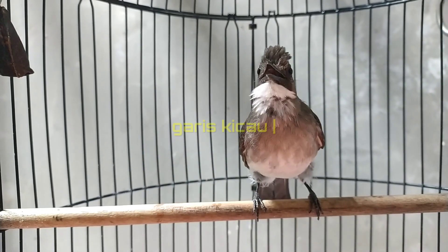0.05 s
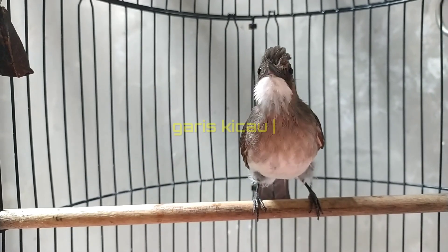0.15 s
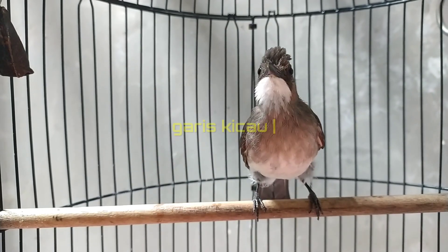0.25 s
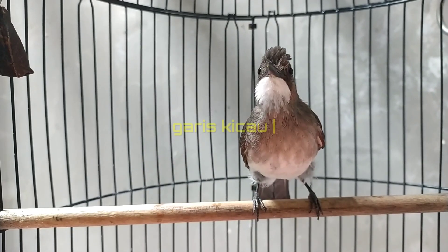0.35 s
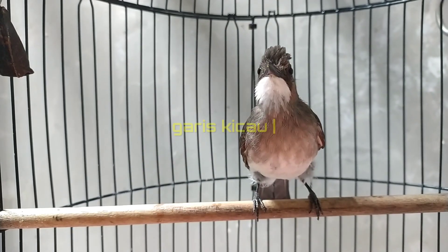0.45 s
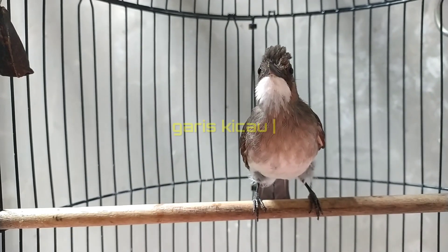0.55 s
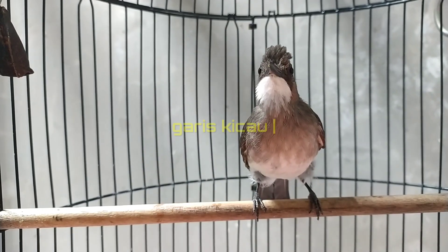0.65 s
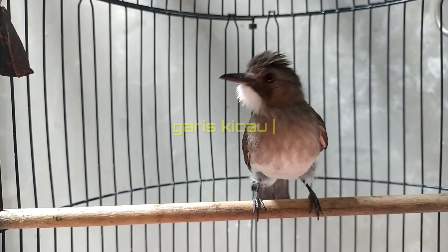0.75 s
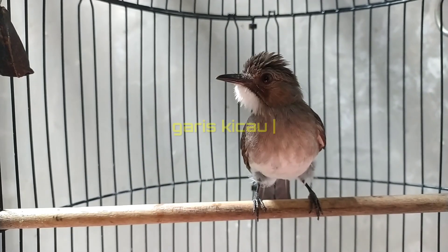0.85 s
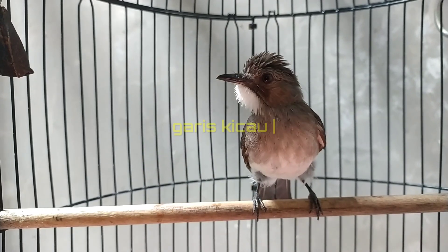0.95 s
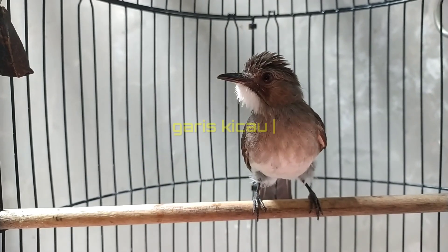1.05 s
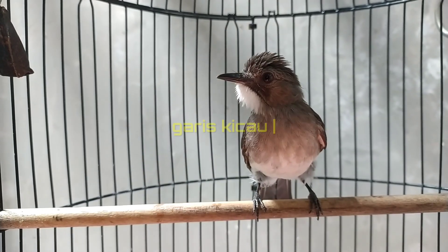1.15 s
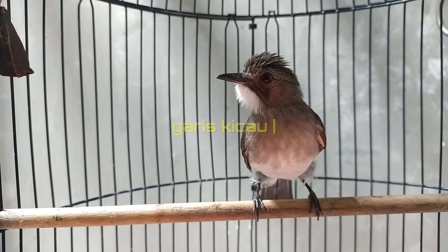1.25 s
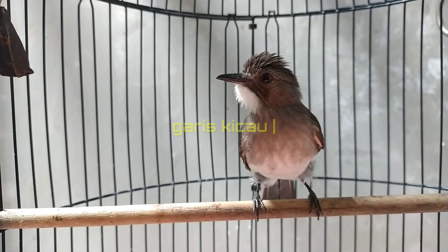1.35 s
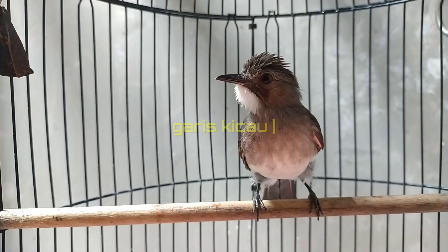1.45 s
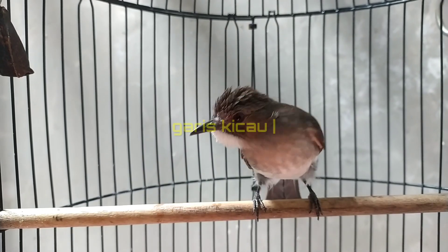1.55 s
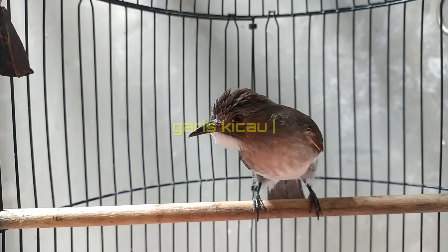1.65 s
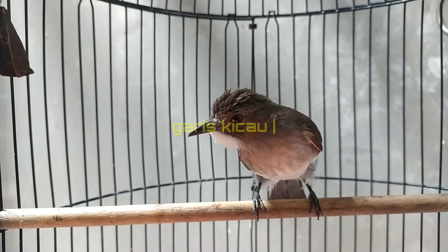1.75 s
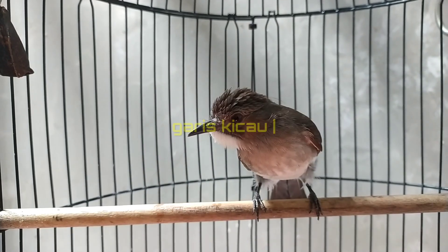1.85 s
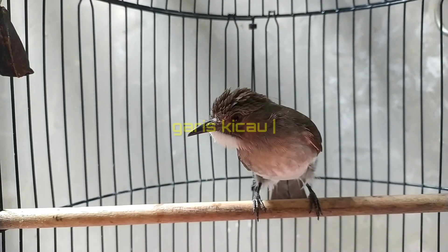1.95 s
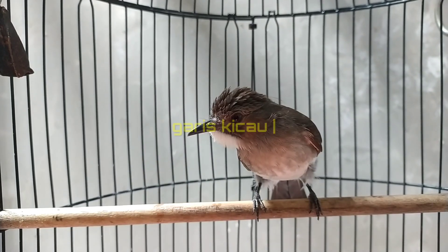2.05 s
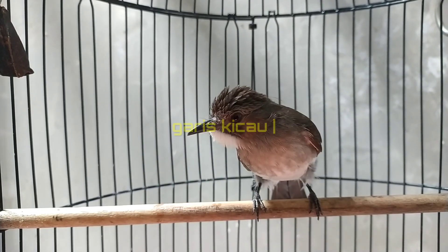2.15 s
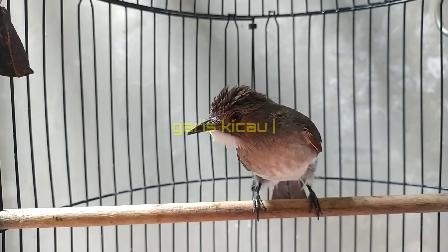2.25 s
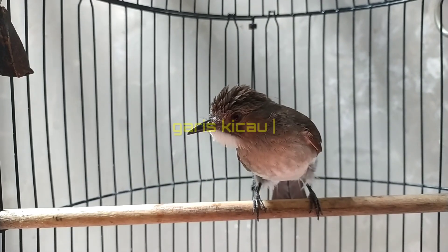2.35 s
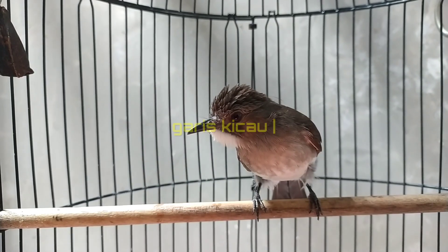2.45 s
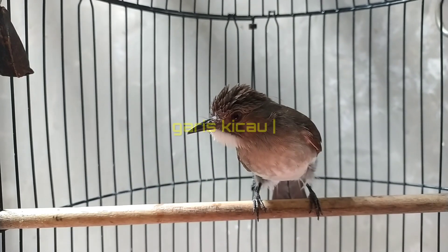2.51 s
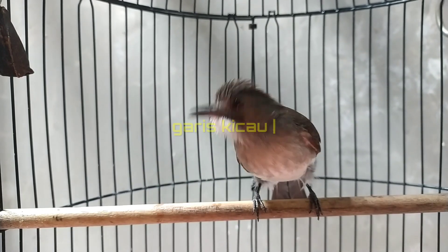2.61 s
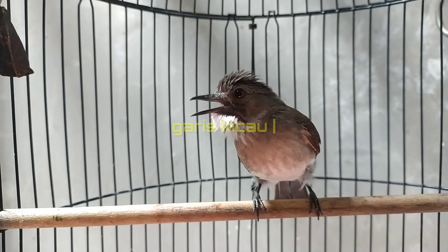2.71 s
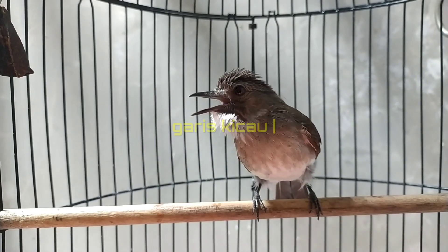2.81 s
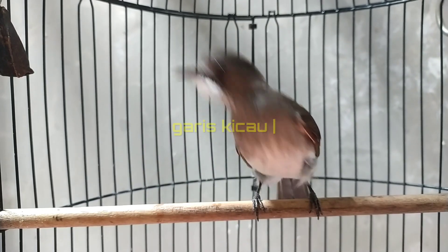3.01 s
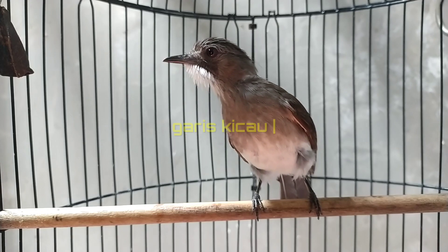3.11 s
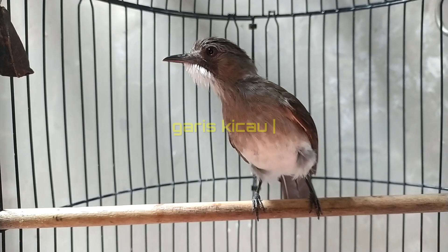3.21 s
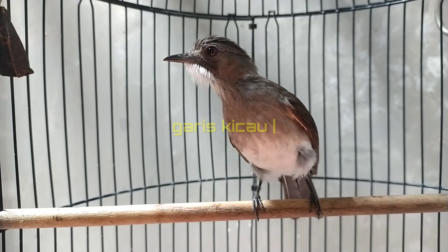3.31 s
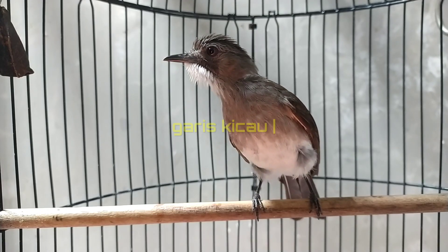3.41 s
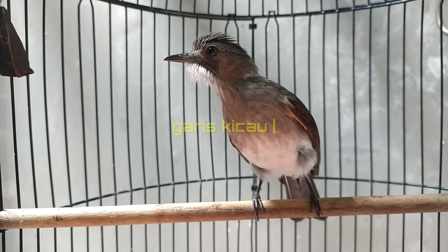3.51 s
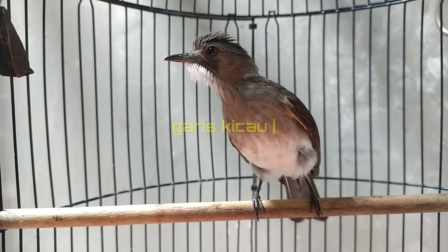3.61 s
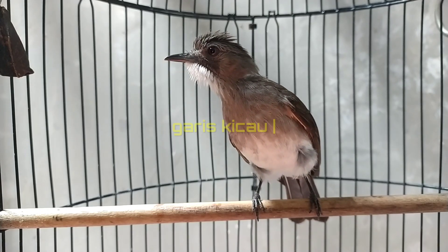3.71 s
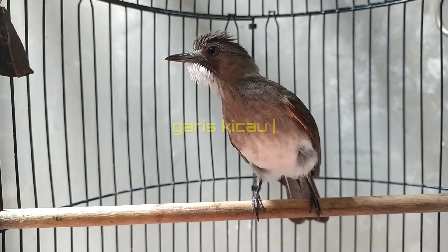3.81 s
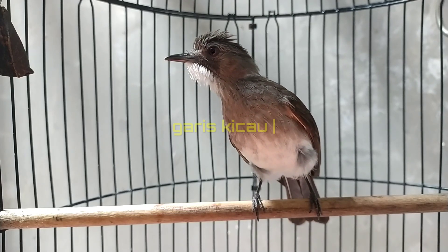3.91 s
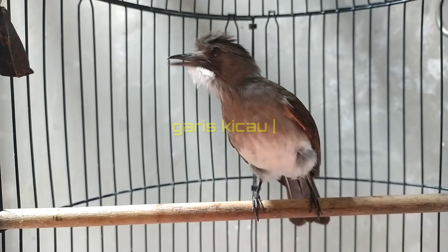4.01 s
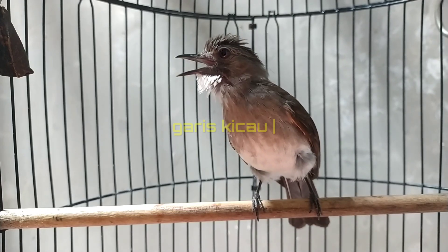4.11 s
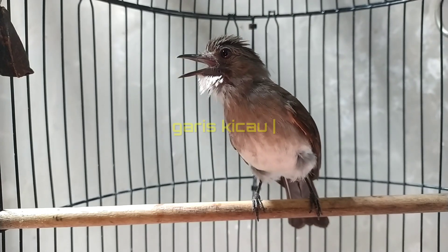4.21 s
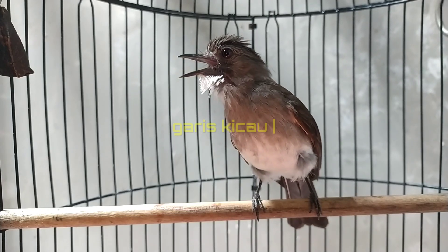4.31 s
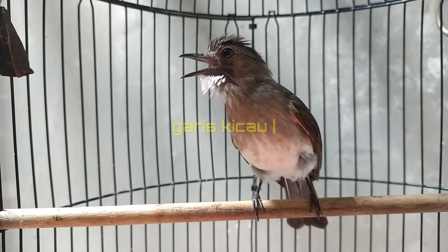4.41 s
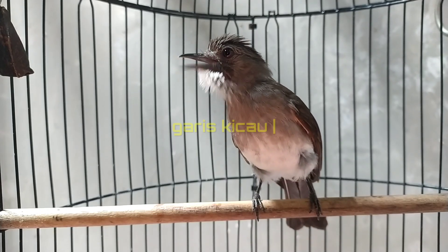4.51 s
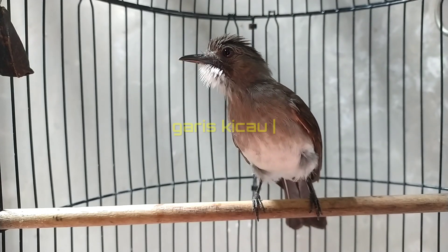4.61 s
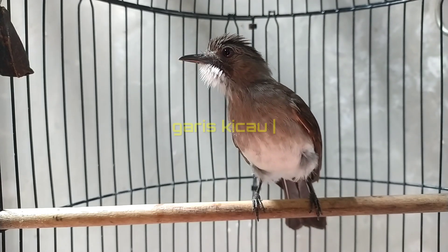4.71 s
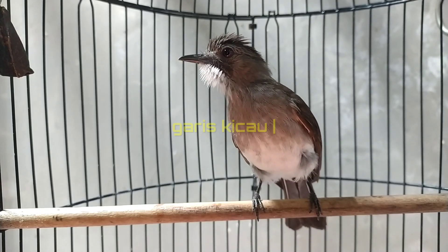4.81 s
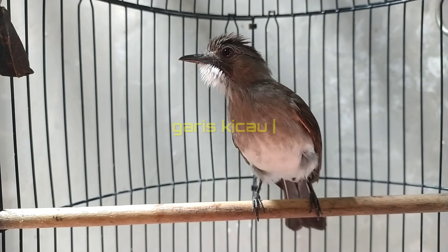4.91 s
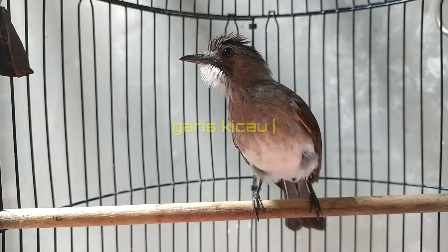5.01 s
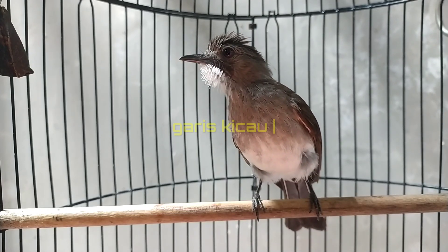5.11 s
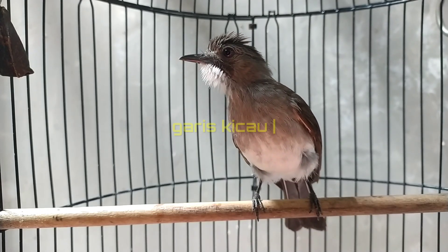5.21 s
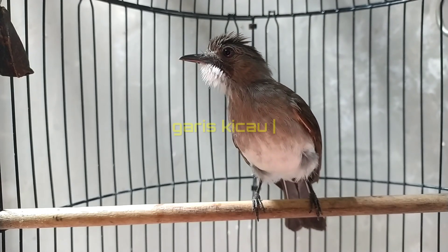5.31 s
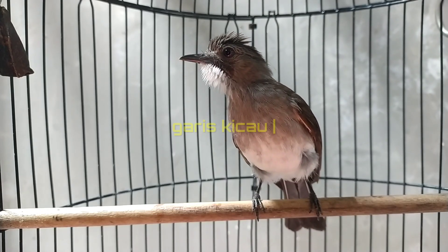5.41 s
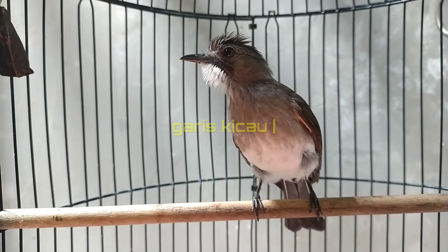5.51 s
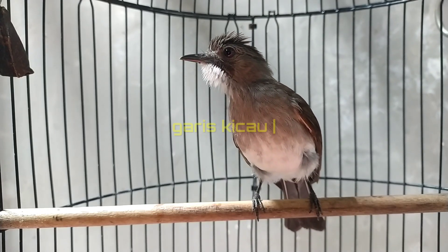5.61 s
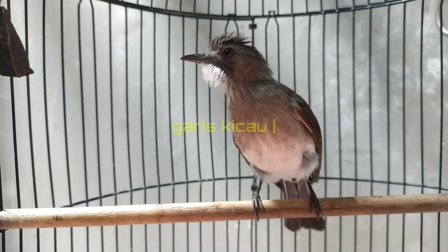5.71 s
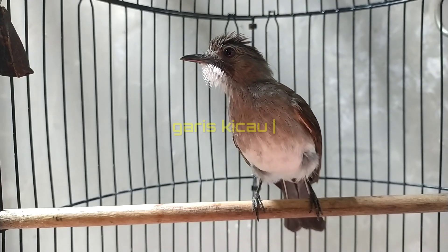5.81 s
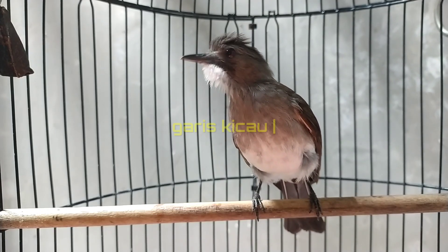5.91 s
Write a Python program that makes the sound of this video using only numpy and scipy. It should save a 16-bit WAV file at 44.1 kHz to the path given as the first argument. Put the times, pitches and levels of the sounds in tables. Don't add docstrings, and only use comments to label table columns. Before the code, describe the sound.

A quiet hard-walled room with soft airy hiss and a very faint low hum. Immediately, from 0 to 0.2 s, a close caged bird gives a clear, nasal, ringing cry that swells fast, rises slightly and drops off. From 0.5 to 1.7 s a smaller bird farther away whistles quick, thin, near-pure notes around 4 to 6 kHz, alternating upward sweeps and brighter hooked notes, blurred by echo. Faint distant harsh scolds overlap at 0.9, 1.4 and 1.6 s, another at 2.1. A tiny feather rustle comes at 2.5. At 2.75 to 3.05 s the close bird bursts into a loud, rough, buzzing scold, falling at the end; a distant answer follows at 3.4 as the hum swells slightly. A longer, somewhat smoother scold runs 4.15 to 4.65. Faint far calls come at 5.1 and 5.5, with a soft rustle at 5.6. Hiss dulls during loud calls.

```python
import sys
import numpy as np
from scipy import signal
from scipy.fft import rfft, irfft
from scipy.io import wavfile
from scipy.ndimage import uniform_filter1d

SR = 44100
rng = np.random.default_rng(int(sys.argv[2]) if len(sys.argv) > 2 else 0)


def unload_wav(signal):
    wavfile.write(
        sys.argv[1],
        SR,
        np.round(np.clip(np.atleast_2d(signal).T, -1, 1) * 32767).astype(np.int16),
    )


def amplitude_ratio(level_db):
    exponent = np.asarray(level_db, float) / 20
    return 10 ** exponent


N = 262395
T = np.arange(N) / SR
BIN_HZ = np.maximum(np.arange(N // 2 + 1) * SR / N, 1)

# f/Hz, level/dB per Hz
HISS_SPECTRUM = [(20, -3.5), (50, -11.5), (100, -15), (300, -16), (600, -19), (1300, -19), (2300, -22.5),
                 (3400, -27), (4600, -30.5), (6500, -35), (9000, -26), (10800, -35), (13000, -42.5),
                 (15500, -53)]
# f/Hz, likeness 0-1
PORT_LIKENESS = [(60, 0.57), (130, 0.61), (290, 0.54), (640, 0.34), (1410, 0.07), (3100, -0.0), (6820, 0.0),
                 (15000, -0.0)]
# t/s, spread/s, level/dB
FEATHER_RUSTLES = [
    (2.47, 0.05, -55.5),
    (5.63, 0.037, -53),
]

# t/s, f/Hz, level/dB
CRY_EFFORT = [
    (0.019, 810, -47.5),
    (.03, 901, -28.5),
    (0.051, 1004, -24.5),
    (0.071, 1036, -24.5),
    (.125, 1038, -26.5),
    (0.167, 1018, -22),
    (0.193, 991, -27.5),
    (.201, 963, -25),
    (.209, 811, -30),
]
CRY_PARTIALS = [-27, -14, -7, -17, -23.5, -33, -29.5, -21, -27, -27.5, -38.5, -32, -33, -42]
# t/s, spread/s, level/dB
BREATH_PUFFS = [
    (0.034, 0.017, -42.5),
    (2.753, 0.011, -42.5),
    (4.154, 0.0071, -53),
]

# t/s, length/s, low f/Hz, top f/Hz, level/dB
SONG_RISES = [
    (.499, 0.042, 4304, 4845, -42),
    (.686, 0.087, 4347, 5475, -35.5),
    (.907, 0.079, 4325, 5575, -34.5),
    (1.135, 0.085, 4330, 5787, -33),
    (1.375, .095, 4327, 5797, -33),
    (1.615, 0.096, 4190, 5783, -33.5),
    (.597, 0.065, 3840, 4555, -49.5),
]
# t/s, length/s, top f/Hz, level/dB
SONG_HOOKS = [
    (0.812, 0.052, 4980, -24.5),
    (1.057, 0.035, 5110, -21.5),
    (1.296, 0.033, 5100, -22),
    (1.54, 0.027, 5076, -21),
]
# t/s, level/dB
SONG_GRACES = [
    (1.041, -43.5),
    (1.281, -44),
    (1.52, -43),
]
# share of length [0-1], share of pitch rise [0-1], level/dB
RISE_OUTLINE = [(0, 0, -8), (.1, 0.45, 7.5), (.4, 0.72, -1), (0.75, 0.86, 4), (0.929, 1, -7),
                (1, 0.76, -89)]
HOOK_OUTLINE = [(0, 0.19, -46), (.08, .2, -12), (0.252, 0.8, -13), (.4, 0.92, -16.5), (0.651, 0.91, -2),
                (0.922, 0.61, -21), (1, 0.81, -38)]
# multiple of pitch, level/dB
WHISTLE_HARMONICS = [(1, -4), (2, -11.5), (3, -27)]

# t/s, length/s, top f/Hz, level/dB, warble depth [0-.4]
NEIGHBOUR_SCOLDS = [
    (0.941, .36, 903.5, -61, 0.32),
    (1.388, 0.12, 869, -59.5, 0.15),
    (1.62, .22, 936, -57, 0.27),
    (2.113, 0.34, 943, -62.5, 0.2),
    (3.397, 0.26, 914, -62, 0.23),
    (5.1, 0.26, 931, -62.5, 0.29),
    (5.468, 0.19, 943.6, -60.5, 0.29),
]
# share of length [0-1], pitch ratio, level/dB
NEIGHBOUR_OUTLINE = [(0, .975, -5), (.3, 1, 0), (.75, 0.96, -2.5), (1, .97, -14)]
# multiple, steady centre level/dB, level/dB of lines -2, -1, +1, +2 beats away at full warble
NEIGHBOUR_PARTIALS = [(2, -20, -42, -16, -15, -47), (3, -11.5, -33, -15, -15, -14),
                      (4, -2.5, -2.5, -6, -7, -8)]
FIRST_STRONG_PARTIALS = [(1, -45, -73, -47.5, -45, -48), (2, -18, -33, -29.5, -18.5, -64),
                         (3, -21, -31.5, -18, -11.5, -15.5), (4, -0.5, -0.5, -7.5, -2, -15),
                         (5, -20.5, -14.5, -13.5, -14.5, -21.5), (6, -36.5, -26, -30, -19.5, -31)]
SECOND_STRONG_PARTIALS = [(1, -48, -59, -50, -44, -62.5), (2, -20, -30, -27, -13.5, -41),
                          (3, -11.5, -20, -20, -7, -18.5), (4, -4.5, -3, -12, -4, -12),
                          (5, -26.5, -18.5, -24, -32, -50.5), (6, -31, -28, -34, -29, -37)]
FIRST_UPPER_PARTIALS = [-39, -35.5, -28, -24, -28, -33.5, -49, -41, -38, -43.5, -54]
SECOND_UPPER_PARTIALS = [-31.5, -27.5, -21.5, -28.5, -28.5, -42, -38, -41, -64, -60, -43.5]
# t/s, f/Hz, level/dB, warble depth [0-.4]
FIRST_EFFORT = [
    (2.742, 813, -39.5, 0.35),
    (2.762, 872.7, -19, 0.38),
    (2.795, 886.6, -16.5, 0.45),
    (2.86, 875, -17.5, 0.43),
    (2.945, 834.4, -18, 0.19),
    (2.995, 840.5, -23, 0.27),
    (3.02, 808, -21, 0.14),
    (3.034, 763, -22, .1),
]
SECOND_EFFORT = [
    (4.142, 827, -44.5, 0.23),
    (4.168, 868.4, -19.5, 0.31),
    (4.2, 917.5, -20, .3),
    (4.25, 918, -18, 0.19),
    (4.41, 879.2, -20, 0.27),
    (4.51, 889.3, -21, 0.17),
    (4.56, 924, -19, 0.2),
    (4.6, 926, -19.5, 0.12),
    (4.624, 896, -21.5, .2),
]
SCOLD_BEATS_HZ = 143.3, 146.6

# f/Hz, t60/s, level/dB
ROOM_OCTAVES = [(518, 0.42, -18), (965, 0.94, 2), (2090, 0.49, 1.5), (3750, 0.64, 7), (7907, 0.5, 4.5),
                (15020, 0.07, 6)]
PORT_PANS_DB = 1.2, -1.6, 1.0, -.6, .3
PORT_SHADES_HZ = 3500, 29630, 30000, 30000, 30000

AIR_DB = -56.5
HUM_DB, HUM_SWELL_DB, HUM_PEAK_S, HUM_SPREAD_S = -72.5, 7.5, 3.44, 0.59
FULL_WARBLE = 0.4
RASP_DB, RASP_HZ = -19, 300
BREATH_IN_S, CUT_OFF_S, CUT_OFF_SAG, FAINT_DB = 0.0074, 0.0088, 0.12, -27.5
THROAT_HZ, THROAT_WIDTH_HZ, THROAT_DB = 3150, 940, 4
PUFF_LOW_HZ, PUFF_HIGH_HZ = 3500, 11000
GRACE_S, GRACE_HZ, GRACE_TOP_HZ = 0.016, 3990, 3995
HOOK_FROM_HZ = 3980
NEIGHBOUR_BEAT_HZ = 137.1


def on_log(table, hz):
    table_hz, values = np.transpose(table)
    return np.interp(np.log(hz), np.log(table_hz), values)


def unit(x):
    return x / np.sqrt(np.mean(x ** 2))


def wander(rate, size):
    k = max(int(SR / rate), 2)
    smooth = uniform_filter1d(rng.standard_normal(size), k)
    return unit(uniform_filter1d(smooth, k))


def band_noise(low_hz, high_hz, shape):
    sos = signal.butter(2, [low_hz, high_hz], "bandpass", fs=SR, output="sos")
    return signal.sosfilt(sos, rng.standard_normal(shape))


def room_hiss():
    like = np.clip(on_log(PORT_LIKENESS, BIN_HZ), 0, 1)
    spectra = rfft(rng.standard_normal((2, N))) * amplitude_ratio(on_log(HISS_SPECTRUM, BIN_HZ))
    mid, side = spectra * np.sqrt([1 + like, 1 - like])
    ports = irfft(np.array([mid + side, mid - side]), N)
    return unit(ports) * amplitude_ratio(AIR_DB + 0.5 * wander(0.9, N))


def hum():
    swell = np.exp(-((T - HUM_PEAK_S) / HUM_SPREAD_S) ** 2)
    phase = 2 * np.pi * np.cumsum(100.5 + 1.4 * wander(4.38, N)) / SR
    return amplitude_ratio(HUM_DB + HUM_SWELL_DB * swell) * np.sin(phase)


def syrinx(calls, partials, jitter, curl):
    out = np.zeros(N)
    m = np.arange(-3, 3)[:, None]
    for call in calls:
        s, *columns = np.transpose(call)
        span = (T >= s[0]) & (T <= s[-1])
        hz, db, depth, rate = (np.interp(T[span], s, c) for c in columns)
        size = len(hz)
        beat_hz = rate * (1 + 8 * jitter * wander(49, size))
        beat = 2 * np.pi * np.cumsum(beat_hz) / SR
        pitch_hz = uniform_filter1d(hz, 150) * (1 + jitter * wander(210, size))
        phase = 2 * np.pi * np.cumsum(pitch_hz) / SR
        warble = np.clip(depth / FULL_WARBLE, 0, 1)
        tone, power = 0, 0
        for k, centre, down2, down1, up1, up2 in partials:
            line_db = np.array([down2 - 12, down2, down1, centre, up1, up2])
            gain = amplitude_ratio(line_db)[:, None] * warble ** np.abs(m)
            gain[3] *= np.cos(0.14 * k * warble)
            lines = gain * np.sin(k * phase + m * beat + curl * m * m + k * k)
            tone = tone + lines.sum(axis=0)
            power = power + (gain ** 2).sum(axis=0) / 2
        rasp = 1 + amplitude_ratio(RASP_DB) * wander(RASP_HZ, size)
        out[span] += amplitude_ratio(db) * tone / np.sqrt(power) * rasp
    return out


def alike(levels_db, order):
    return [(order + i, *[db] * 5) for i, db in enumerate(levels_db)]


def voiced(curve, beat_hz):
    s, hz, db, depth = curve[0]
    start = (s - BREATH_IN_S, hz, db + FAINT_DB, depth)
    s, hz, db, depth = curve[-1]
    stop = (s + CUT_OFF_S, hz * (1 - CUT_OFF_SAG), db + FAINT_DB, depth)
    return [[(*row, beat_hz) for row in (start, *curve, stop)]]


def throat(x):
    b, a = signal.iirpeak(THROAT_HZ, THROAT_HZ / THROAT_WIDTH_HZ, fs=SR)
    return x + amplitude_ratio(THROAT_DB) * signal.lfilter(b, a, x)


def puff(s, spread, db):
    swell = np.exp(-((T - s) / spread) ** 2)
    return amplitude_ratio(db) * swell * band_noise(PUFF_LOW_HZ, PUFF_HIGH_HZ, N)


def clear_cry():
    steady = [(*row, 0) for row in CRY_EFFORT]
    voice = syrinx(voiced(steady, 0), alike(CRY_PARTIALS, order=1), jitter=0.001, curl=0)
    return throat(voice) + puff(*BREATH_PUFFS[0])


def room_echo():
    t = np.arange(SR) / SR
    out = 0
    for hz, t60, db in ROOM_OCTAVES:
        noise = band_noise(hz / 2 ** 0.5, min(hz * 2 ** 0.5, 0.45 * SR), (2, SR))
        decay = 1000.0 ** (-t / t60)
        out = out + amplitude_ratio(db) * noise * decay / np.sqrt(t60 * SR / (2 * np.log(1000)))
    return out * np.clip((t - 0.003) / 0.005, 0, 1)


def heard(x, lag_samples, shade_hz, pan_db, wet_db):
    shaded_hz = BIN_HZ / np.hypot(1, BIN_HZ / shade_hz)
    turn = np.exp(-1j * np.pi * shaded_hz * lag_samples / SR * np.array([[1], [-1]]))
    direct = irfft(rfft(x) * turn, N) * amplitude_ratio(np.array([[pan_db], [-pan_db]]) / 2)
    echo = signal.fftconvolve(x[None], room_echo(), axes=1)[:, :N]
    return direct + amplitude_ratio(wet_db) * echo


def whistles(notes, outline):
    out = np.zeros(N)
    share, rise, outline_db = np.transpose(outline)
    for s, length, low_hz, top_hz, db in notes:
        span = (T >= s) & (T <= s + length)
        at = (T[span] - s) / length
        glide_hz = low_hz + (top_hz - low_hz) * np.interp(at, share, rise)
        phase = 2 * np.pi * np.cumsum(uniform_filter1d(glide_hz, 200)) / SR
        tone = sum(amplitude_ratio(d) * np.sin(k * phase) for k, d in WHISTLE_HARMONICS)
        out[span] += amplitude_ratio(db + np.interp(at, share, outline_db)) * tone
    return out


def whistled_song():
    graces = [(s, GRACE_S, GRACE_HZ, GRACE_TOP_HZ, db) for s, db in SONG_GRACES]
    hooks = [(s, length, HOOK_FROM_HZ, top_hz, db) for s, length, top_hz, db in SONG_HOOKS]
    return whistles(SONG_RISES + graces, RISE_OUTLINE) + whistles(hooks, HOOK_OUTLINE)


def neighbour():
    calls = []
    for s, length, hz, db, depth in NEIGHBOUR_SCOLDS:
        calls.append([(s + share * length, hz * ratio, db + step_db, depth, NEIGHBOUR_BEAT_HZ)
                      for share, ratio, step_db in NEIGHBOUR_OUTLINE])
    return syrinx(calls, NEIGHBOUR_PARTIALS, jitter=0.0018, curl=0.86)


def feather_rustles():
    swells = sum(amplitude_ratio(db) * np.exp(-((T - s) / w) ** 2) for s, w, db in FEATHER_RUSTLES)
    return band_noise(7500, 11500, (2, N)) * swells


def first_scold():
    partials = FIRST_STRONG_PARTIALS + alike(FIRST_UPPER_PARTIALS, order=7)
    voice = syrinx(voiced(FIRST_EFFORT, SCOLD_BEATS_HZ[0]), partials, jitter=0.0015, curl=0.75)
    return voice + puff(*BREATH_PUFFS[1])


def second_scold():
    partials = SECOND_STRONG_PARTIALS + alike(SECOND_UPPER_PARTIALS, order=7)
    voice = syrinx(voiced(SECOND_EFFORT, SCOLD_BEATS_HZ[1]), partials, jitter=0.0015, curl=0.91)
    return voice + puff(*BREATH_PUFFS[2])


def hushed(background, birds):
    treble = irfft(rfft(background) * np.clip((BIN_HZ - 3800) / 1500, 0, 1), N)
    loudness = np.sqrt(uniform_filter1d((birds ** 2).mean(axis=0), 2500) + 1e-18)
    return background - treble * loudness / (loudness + amplitude_ratio(-47))


def scene():
    background = room_hiss() + hum() + feather_rustles()
    sources = clear_cry(), first_scold(), second_scold(), whistled_song(), neighbour()
    lags_samples = 4.0, 6.0, 8.0, 1.1, -2.5
    wets_db = -12, -10.0, -10.5, 4.53, 5.0
    birds = sum(map(heard, sources, lags_samples, PORT_SHADES_HZ, PORT_PANS_DB, wets_db))
    return birds + hushed(background, birds)


def band_limit(x):
    return signal.sosfilt(signal.butter(12, 15670, fs=SR, output="sos"), x)


def record(dry):
    return band_limit(dry)


dry = scene()
out = record(dry)
unload_wav(out)
```